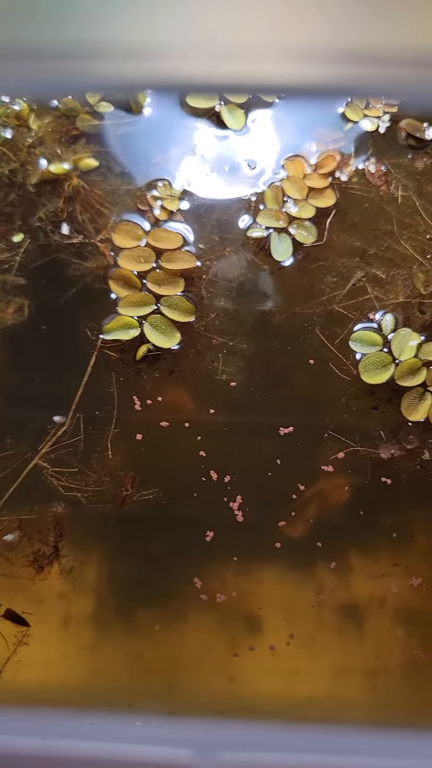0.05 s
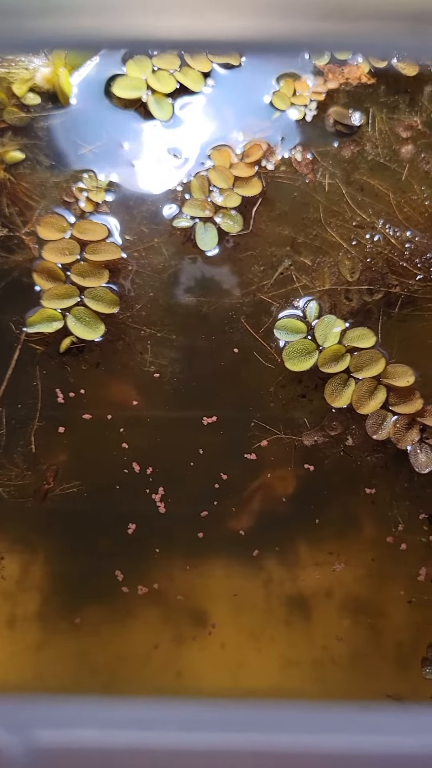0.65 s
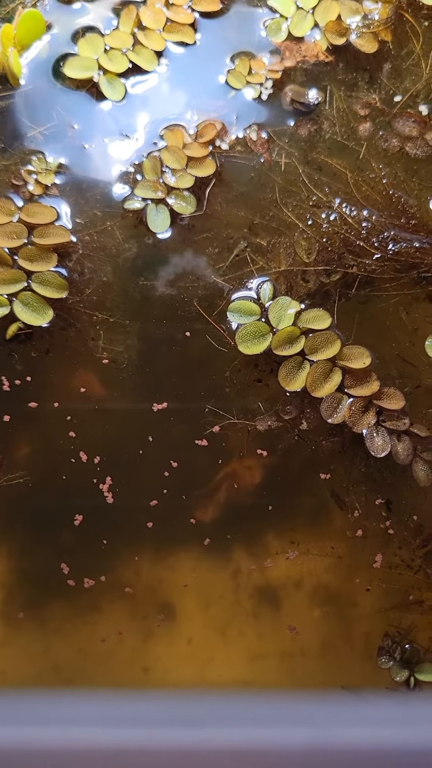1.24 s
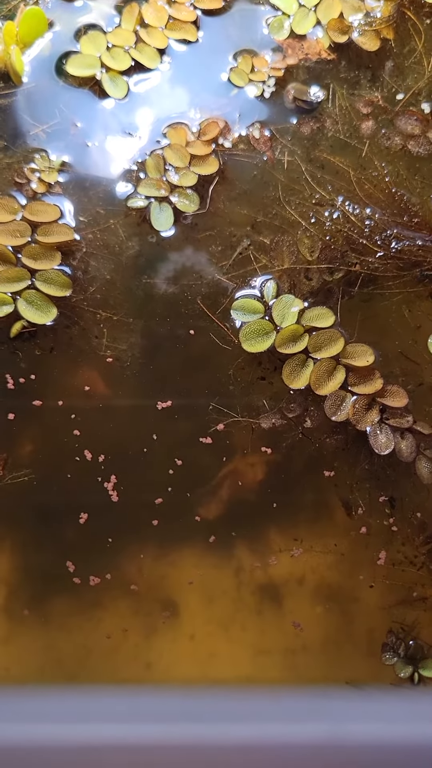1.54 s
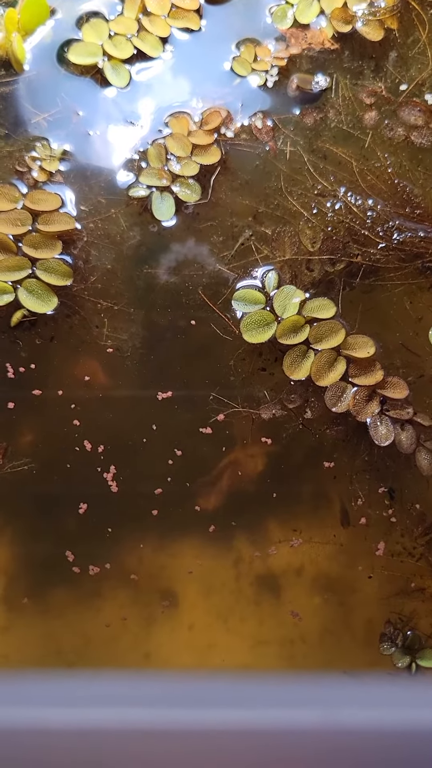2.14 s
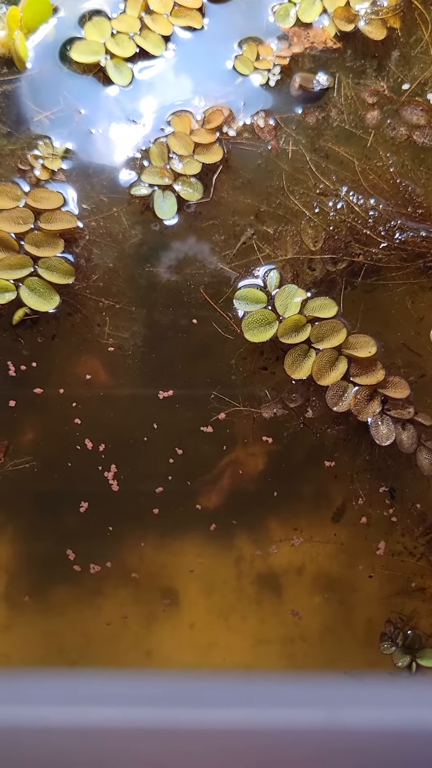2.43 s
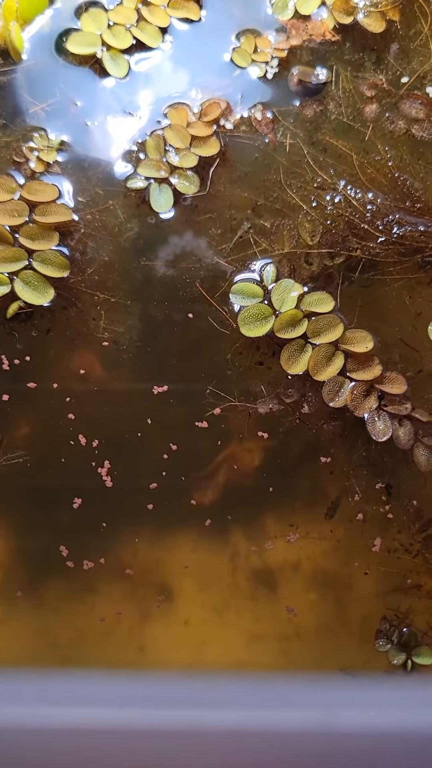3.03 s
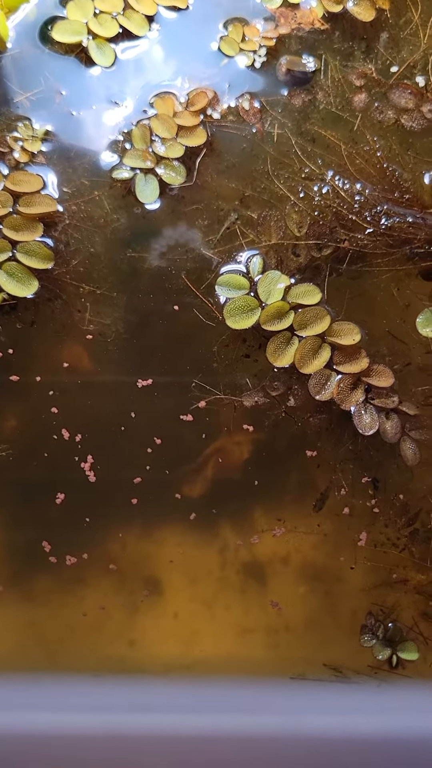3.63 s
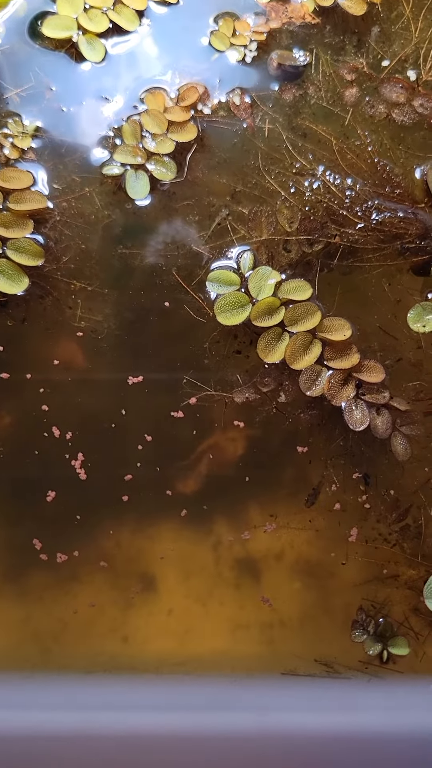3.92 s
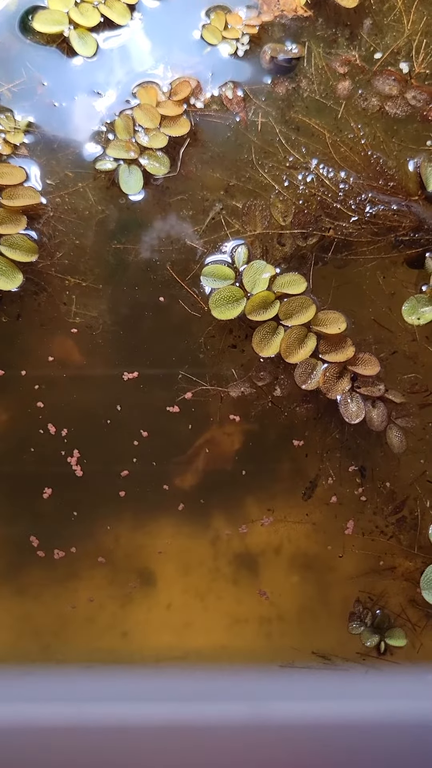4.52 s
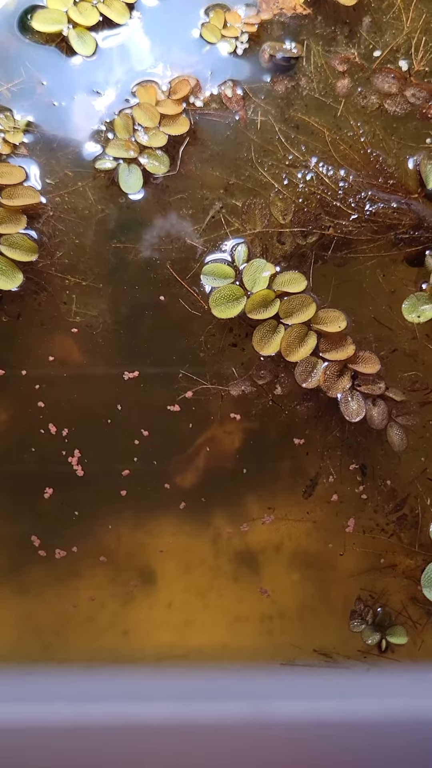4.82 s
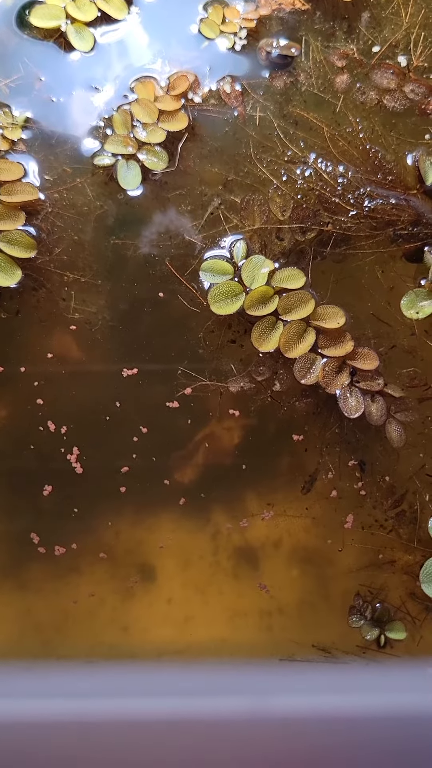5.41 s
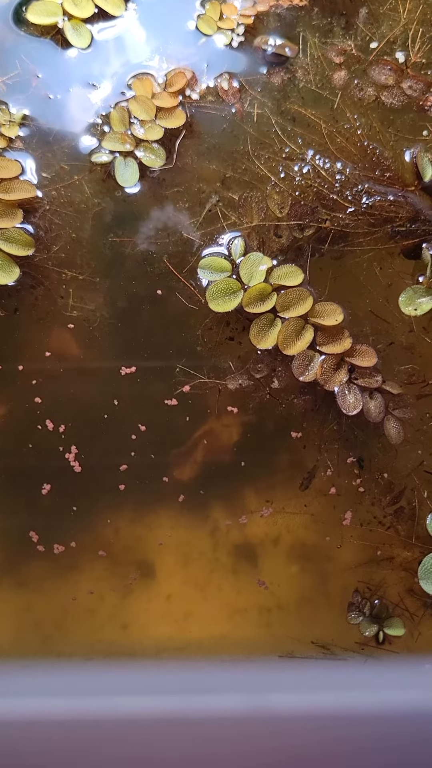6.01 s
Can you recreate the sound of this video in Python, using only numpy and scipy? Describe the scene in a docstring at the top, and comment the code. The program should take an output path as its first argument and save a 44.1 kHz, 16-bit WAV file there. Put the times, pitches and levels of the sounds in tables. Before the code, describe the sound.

A steady low motor hum runs while a few small drips tick into a tub of water and bubbles softly plink.

```python
"""A tub of water with floating plants. From the start, motors hum and beat slowly against the mains
over a soft rush of air. A trapped bubble plinks, then drops tick on the surface close by, the heavier
ones with a knock. At 0.9 s one short swish sounds further off. The last drop lands near 3 s; bubbles
plink, fizz and gurgle on to the end. Two microphone ports hear the bass alike and the rest apart."""
import sys
import numpy as np
from scipy import signal
from scipy.fft import rfft, irfft
from scipy.io import wavfile
from scipy.ndimage import uniform_filter1d

SR = 44100
rng = np.random.default_rng(int(sys.argv[2]) if len(sys.argv) > 2 else 0)


def wrap_up_sound(samples):
    """Save the sound to the file named by the first command line argument, as 16-bit audio."""
    columns = np.atleast_2d(samples).T
    # keep every value between -1 and 1, then stretch to whole-number steps
    tamed = np.clip(columns, -1, 1)
    steps = np.round(tamed * 32767).astype(np.int16)
    wavfile.write(sys.argv[1], SR, steps)


N = 276060
T = np.arange(N) / SR
FREQS = np.arange(N // 2 + 1) * SR / N
DROP_PAN_DB, PUFF_LEAD_S = -9, 0.14
PORT_PHASE_RAD = np.array([[0], [np.pi / 2]])  # left, right

# drop impacts: t/s, level/dB, tilt/(dB/octave), low-pass f/Hz (lower for a softer landing)
DROP_HITS = [(.2700, -48, -11.5, 4200), (0.3175, -55.5, -16, 3200), (0.545, -46, -7, 4800),
             (0.8346, -49.5, -8, 7000), (1.3168, -35, -1, 18000), (1.3518, -55, 0, 16000),
             (1.3723, -44.5, -9, 6000), (2.9374, -41.5, 1, 18000)]
# modes of an impact: f/Hz, t60/s, relative level/dB
IMPACT_MODES = [(880, 0.0045, -15), (1900, 0.0019, 5), (2600, 0.0022, -18), (4060, 0.0052, 4),
                (5230, 0.0015, 14.5), (5850, 0.0028, -4), (9000, 0.0019, 1), (11200, 0.0041, 1.5),
                (13300, 0.0034, 9), (15000, .002, 2)]
# knocks under heavier drops: t/s, f/Hz, level/dB, rise/cycles
DROP_KNOCKS = [(.5445, 460, -30, .5), (1.3171, 2000, -37, .8), (1.3515, 1300, -43, .5),
               (1.372, 920, -37.5, .45), (2.9372, 1750, -34, .7)]
# larger bubbles: t/s, f/Hz, level/dB, glide/fraction of f, t60/s, left minus right/dB
PLINKS = [(.161, 1105, -27.5, -.035, .085, 3), (1.528, 1206, -46, 0, .13, -3),
          (1.692, 4051, -41, .07, .04, 3), (2.074, 1485, -42, .04, .12, 6),
          (2.407, 1190, -41.5, .04, .11, -2), (3.021, 1108, -31.5, 0, .045, 4),
          (3.985, 1050, -28, .06, .075, -1), (4.052, 1090, -40, -.02, .11, 6),
          (4.910, 1123, -39, -.07, .09, 1), (5.530, 1275, -45, .05, .12, -3),
          (5.650, 1105, -33, .03, .06, 1), (5.797, 1770, -38.5, -.11, .14, 1),
          (6.125, 1121, -32.5, 0, .06, -8), (6.152, 1560, -48, .02, .17, 2)]
# swish spectrum: f/Hz, relative density/dB
SWISH_SPECTRUM = [(220, -84), (350, -52.5), (700, -67.5), (1000, -60), (1800, -62), (2300, -67.5),
                  (3000, -67), (3900, -72.5), (4800, -84), (6500, -83.5), (9000, -104), (15000, -112)]
# fizzes: peak t/s, centre f/Hz, level/dB, half-width/fraction of f
FIZZ_PUFFS = [(.337, 6000, -64, .1), (.655, 2600, -63, .12), (1.199, 6000, -58.5, .06),
              (2.384, 6500, -65, .1), (3.015, 7400, -67, .08), (3.365, 3500, -66, .1),
              (3.477, 3500, -67, .1), (4.075, 3620, -63, .1), (4.23, 5400, -66, .08),
              (4.345, 5000, -66, .08), (4.900, 3520, -63, 0.13), (4.975, 3450, -66, .15),
              (5.035, 2900, -64, .15), (5.365, 3960, -67, .06), (5.44, 5500, -62, 0.25),
              (5.985, 1850, -62.5, .1)]
# clearer bubble bursts: t/s, centre f/Hz, level/dB
CLEAR_BURSTS = [(2.754, 14500, -61), (3.055, 8260, -57.5), (3.06, 13000, -61), (3.383, 12000, -61),
                (3.89, 13200, -59), (4.192, 9200, -60), (4.29, 8300, -64), (4.972, 14200, -57),
                (5.695, 12400, -59.5), (6.11, 14000, -61)]
# gurgles: peak t/s
GURGLE_TIMES_S = [.17, 1.259, 1.53, 2.24, 2.87, 3.54, 5.33]
# motor shafts, slipping behind the mains: f/Hz
SHAFT_TONES_HZ = [55.05, 58.67, 100.9, 117.3, 201.8, 219.4, 385.3]
# the same shaft tones: level/dB
SHAFT_LEVELS_DB = [-27, -51, -61.5, -63, -60.5, -83, -70]
# mains buzz: harmonic number, mid level/dB, side level/dB
MAINS_HARMONICS = [(1, -40.5, -57), (2, -47.5, -73), (3, -53.5, -95), (4, -60, -73), (5, -88, -63),
                   (6, -79, -53), (7, -59, -62), (8, -66.5, -73), (9, -61.5, -60), (10, -69, -69),
                   (11, -70.5, -102), (12, -83, -58), (13, -62.5, -69), (15, -69.5, -61.5), (16, -65, -79),
                   (17, -110, -70), (19, -76, -81), (20, -73.5, -69), (22, -72.5, -79), (26, -83.5, -67.5)]
# rush of air: f/Hz, mid density/dB, side density/dB
AIR_SPECTRUM = [(25, -77, -79), (71, -63.5, -72), (143, -76, -106), (236, -73, -77.5), (283, -71, -73.5),
                (394, -73.5, -73), (580, -81.5, -75.5), (1080, -86, -81), (1486, -93, -90.5),
                (2580, -98, -96.5), (3560, -98, -97.5), (4230, -100.5, -100), (7350, -102.5, -102.5),
                (8470, -109, -109), (11540, -109, -109), (12000, -104, -104), (15200, -108, -108.5)]
# edges of its flickering bands: f/Hz
AIR_EDGES_HZ = [0, 330, 600, 1200, 3000, 4800, 7500, 11800, SR]
# drift of its treble: t/s, relative level/dB
AIR_TREBLE = [(0, 0), (1.5, -0.5), (1.9, -0.5), (2.25, -1.5), (3.05, 1.5), (4.3, 1.2), (4.5, 0.7),
              (6.26, 0)]
# room's stereo balance: f/Hz, left minus right/dB
ROOM_LEAN = [(60, -0.1), (120, -0.5), (200, 3), (380, -4.5), (700, -3), (1290, -1), (2600, 4), (4100, -2),
             (7000, 0), (8500, 10.5), (11000, 8), (12300, 3.5), (15500, 3.5)]


def drops(pivot_hz=4000, detune=0.012, spray_hz=12000, spray_width=0.37, spray_db=-19, spray_s=0.01):
    """Each drop slaps the surface: a tick that rings for milliseconds and throws a little spray."""
    out, t = np.zeros((2, N)), T[:SR // 20]
    hz, t60_s, mode_db = np.transpose(IMPACT_MODES)[:, :, None]
    for at_s, db, tilt_db, cutoff_hz in DROP_HITS:
        pitch_hz = hz * (1 + detune * rng.standard_normal((2, len(IMPACT_MODES), 1)))
        gain = undb(db + mode_db + tilt_db * np.log2(hz / pivot_hz))
        age = np.log(1000) * t / t60_s
        envelope = 2 * (1 - np.exp(-2 * age)) * np.exp(-age)
        modes = gain * envelope * np.sin(2 * np.pi * pitch_hz * t + PORT_PHASE_RAD[:, None])
        spray = undb(db + spray_db + tilt_db) * np.exp(-t / spray_s) * hiss(spray_hz, spray_width, len(t))
        lowpass = signal.butter(4, cutoff_hz, fs=SR, output="sos")
        add(out, at_s, signal.sosfilt(lowpass, modes.sum(axis=1) + spray))
    return room(out * pan(DROP_PAN_DB), t60_s=0.12, wet_db=-14)


def knocks():
    """Heavier drops also push the water: a dull knock of a few cycles."""
    out, t = np.zeros((2, N)), T[:SR // 40]
    for at_s, hz, db, rise_cycles in DROP_KNOCKS:
        age = t * hz / rise_cycles
        add(out, at_s, undb(db) * age * np.exp(1 - age) * np.sin(2 * np.pi * hz * t + PORT_PHASE_RAD))
    return out * pan(DROP_PAN_DB)


def bubbles(rise_s=0.009, glide_s=0.022, blur=0.25, blur_width=0.15):
    """Trapped bubbles plink and glide in pitch as they settle, blurred by the stirred water."""
    out, t = np.zeros((2, N)), T[:SR // 5]
    swell = 1 - np.exp(-(t / rise_s) ** 2)
    for at_s, hz, db, glide, t60_s, pan_db in PLINKS:
        pitch_hz = hz * (1 + glide * (1 - np.exp(-t / glide_s)))
        phase = 2 * np.pi * np.cumsum(pitch_hz) / SR + PORT_PHASE_RAD
        envelope = undb(db) * swell * np.exp(-np.log(1000) * t / t60_s)
        ring = np.sin(phase) + blur * hiss(hz, blur_width, len(t))
        add(out, at_s, envelope * ring * pan(pan_db))
    return room(out, t60_s=0.35, wet_db=-11)


def swish(start_s=0.899, rise_s=0.031, fade_s=0.058, gain_db=3.0, grain_db=0.95):
    """A watery swish some way off: swells quickly, dies away in the room."""
    age_s = np.maximum(T - start_s, 0)
    envelope = (1 - np.exp(-(age_s / rise_s) ** 2)) * np.exp(-age_s / fade_s)
    envelope *= undb(gain_db + grain_db * walk(220))
    density = colour(*np.transpose(SWISH_SPECTRUM))
    mid = undb(-6.0) * envelope * noise(density)
    side = undb(-2.5) * envelope * noise(density)
    return room(ports(mid, side), t60_s=0.29, wet_db=-6)


def fizzes(swell_s=0.025):
    """Soft puffs of high hiss."""
    out = np.zeros((2, N))
    for peak_s, hz, db, width in FIZZ_PUFFS:
        add(out, peak_s - PUFF_LEAD_S, undb(db) * puff(hz, width, swell_s))
    return room(out, t60_s=0.13, wet_db=4.0)


def spritzes(count=90, low_hz=4500, high_hz=15000, faint_db=-69, spread_db=3, rise_s=0.0019,
             fade_s=0.035, width=0.14):
    """Tiny bubbles burst in short high sprays: a few clear, many faint."""
    out, t = np.zeros((2, N)), T[:SR // 8]
    envelope = (1 - np.exp(-t / rise_s)) * np.exp(-t / fade_s)
    faint = [(when * T[-1], low_hz + (high_hz - low_hz) * height, faint_db + spread_db * (2 * force - 1))
             for when, height, force in rng.uniform(size=(count, 3))]
    for at_s, hz, db in CLEAR_BURSTS + faint:
        add(out, at_s, undb(db) * envelope * hiss(hz, width, len(t)))
    return ports(*out)


def gurgles(hz=390, width=0.16, swell_s=0.071, level_db=-47, pan_db=-4):
    """Swells of narrow low noise, like water shifting in the tub."""
    out = np.zeros((2, N))
    for peak_s in GURGLE_TIMES_S:
        add(out, peak_s - PUFF_LEAD_S, undb(level_db) * puff(hz, width, swell_s))
    return out * pan(pan_db)


def simmer(count=640, low_hz=1100, high_hz=5800, base_db=-63, tilt_db_oct=-2.0, spread_db=2.0,
           mean_rise_s=0.004):
    """Many tiny bubbles, blurred by the room: the smaller, the higher and fainter."""
    out, t = np.zeros((2, N)), T[:SR // 12]
    for when, smallness, force, life, left, right in rng.uniform(size=(count, 6)):
        hz = low_hz * (high_hz / low_hz) ** smallness
        age = t / (mean_rise_s * (0.5 + life))
        db = base_db + tilt_db_oct * np.log2(hz / low_hz) + spread_db * (2 * force - 1)
        phase = 2 * np.pi * (hz * t * (1 + t) + np.array([[left], [right]]))  # slight upward glide
        add(out, when * T[-1], undb(db) * age * np.exp(1 - age) * np.sin(phase))
    return room(out, t60_s=0.2, wet_db=1)


def hum(mains_hz=60.015, in_step_s=2.98, shaft_side_db=-15, shaft_waver_db=0.4, buzz_waver_db=0.18):
    """Shafts turn just under the mains rate, so their drone throbs against the mains buzz."""
    rad_per_hz = 2 * np.pi * (T - in_step_s)
    mid, side = np.zeros(N), np.zeros(N)
    for hz, db in zip(SHAFT_TONES_HZ, SHAFT_LEVELS_DB):
        gain = undb(db + shaft_waver_db * walk(2.7))
        mid += gain * np.cos(hz * rad_per_hz)
        side -= gain * undb(shaft_side_db) * np.sin(hz * rad_per_hz)
    for harmonic, mid_db, side_db in MAINS_HARMONICS:
        is_overtone = harmonic > 1
        phase = harmonic * mains_hz * rad_per_hz + is_overtone * rng.uniform(0, 2 * np.pi)
        gain = undb(is_overtone * buzz_waver_db * walk(3.0))
        mid += gain * undb(mid_db) * np.cos(phase)
        side -= gain * undb(side_db) * np.sin(phase)
    return np.sqrt(2) * ports(mid, side)


def air(low_flicker_db=1.37, treble_flicker_db=1.0, shared_flicker_db=1.15, treble_rate_hz=55,
        early_db=0.9, settle_s=0.99):
    """An even rush: bands flicker, the treble fastest; the middle starts slightly stronger."""
    hz, mid_db, side_db = np.transpose(AIR_SPECTRUM)
    spectra = rfft([noise(colour(hz, mid_db)), noise(colour(hz, side_db))])
    shared_db = shared_flicker_db * walk(treble_rate_hz)
    out = np.zeros((2, N))
    for low_hz, high_hz in zip(AIR_EDGES_HZ, AIR_EDGES_HZ[1:]):
        if low_hz < 3000:
            db = low_flicker_db * walk(20)
        else:
            db = shared_db + treble_flicker_db * walk(treble_rate_hz)
        if 330 <= low_hz < 3000:
            db += early_db / (1 + (T / settle_s) ** 4)
        if low_hz >= 4800:
            db += np.interp(T, *np.transpose(AIR_TREBLE))
        in_band = (FREQS >= low_hz) & (FREQS < high_hz)
        out += irfft(spectra * in_band, N) * undb(db)
    return ports(*out)


def room(dry, t60_s, wet_db):
    """Direct sound plus a diffuse tail, different at each port."""
    t = T[:SR // 2]
    tail = rng.standard_normal((2, len(t))) * np.exp(-np.log(1000) * t / t60_s)
    tail /= np.sqrt(np.sum(tail ** 2, axis=1, keepdims=True))
    return dry + undb(wet_db) * signal.fftconvolve(dry, tail, axes=1)[:, :N]


def ports(mid, side):
    """Mid and side to left and right, with the room's lean."""
    lean = np.sqrt(colour(*np.transpose(ROOM_LEAN)))
    gains = np.array([lean, 1 / lean]) / np.sqrt((lean ** 2 + lean ** -2) / 2)
    return irfft(rfft([mid + side, mid - side]) * gains, N)


def puff(hz, width, swell_s):
    """Band noise under a Gaussian swell, peaking PUFF_LEAD_S in."""
    t = T[:int(2 * PUFF_LEAD_S * SR)] - PUFF_LEAD_S
    return hiss(hz, width, len(t)) * np.exp(-(t / swell_s) ** 2)


def hiss(hz, width, samples):
    """Two independent unit-level noises around hz, half-width width * hz."""
    freqs = np.arange(samples // 2 + 1) * SR / samples
    band = 1 / (1 + ((freqs - hz) / (width * hz)) ** 2)
    y = irfft(rfft(rng.standard_normal((2, samples))) * band, samples)
    return y / y.std()


def noise(density):
    """Noise of the given density per root Hz."""
    return irfft(rfft(rng.standard_normal(N)) * density, N) * np.sqrt(SR / 2)


def walk(rate_hz):
    """Random steps at rate_hz, smoothed twice; unit spread."""
    hold = int(SR / rate_hz)
    steps = np.repeat(rng.standard_normal(N // hold + 1), hold)
    y = uniform_filter1d(uniform_filter1d(steps, hold), hold)[:N]
    return y / y.std()


def colour(hz, db):
    """Gain per bin from points joined on a log frequency axis."""
    return undb(np.interp(np.log(FREQS + 1), np.log(hz), db))


def pan(db):
    """Port gains for a left-minus-right level."""
    return undb(np.array([[db], [-db]]) / 2)


def undb(db):
    """Decibels to gain."""
    return 10 ** (np.asarray(db) / 20)


def add(out, at_s, sound):
    """Mix a short sound in at at_s."""
    i = int(at_s * SR)
    out[..., i:i + sound.shape[-1]] += sound[..., :N - i]


def scene():
    """Hum and air, small water sounds on top."""
    bed = hum() + air()
    return bed + drops() + knocks() + bubbles() + simmer() + fizzes() + spritzes() + gurgles() + swish()


def record(dry):
    """Steep low-pass at 15.9 kHz."""
    return signal.sosfilt(signal.ellip(10, 0.2, 80, 15900, fs=SR, output="sos"), dry)


dry = scene()
out = record(dry)
wrap_up_sound(out)
```